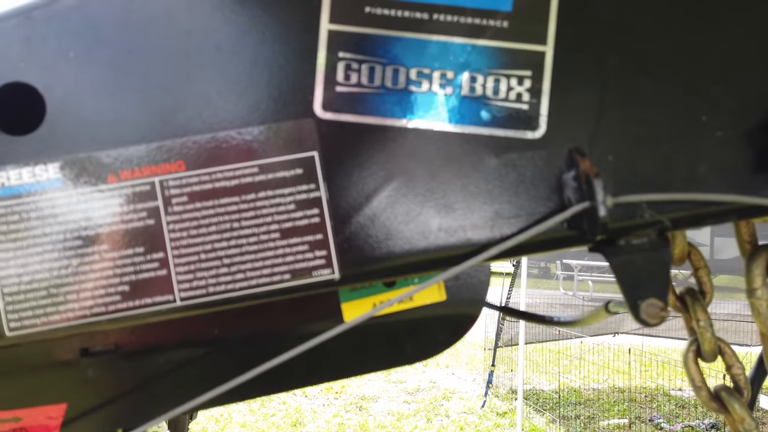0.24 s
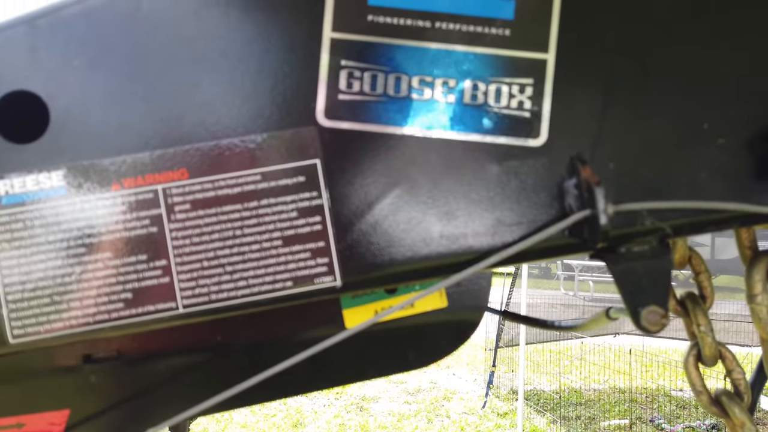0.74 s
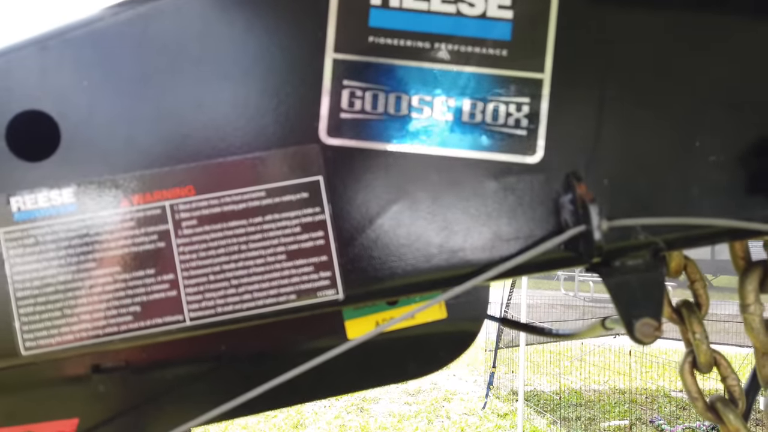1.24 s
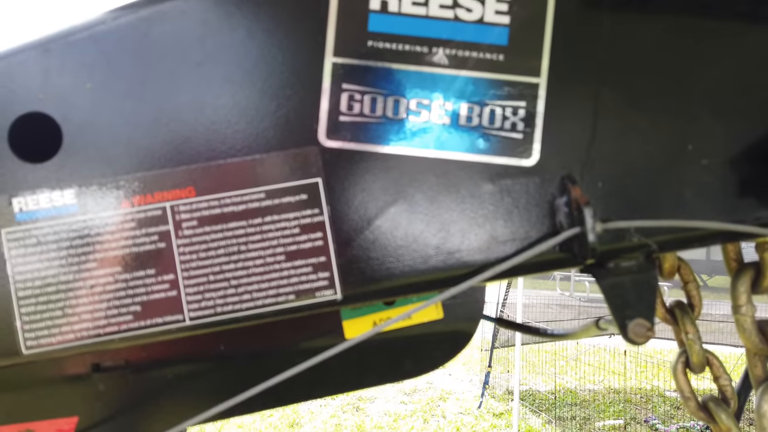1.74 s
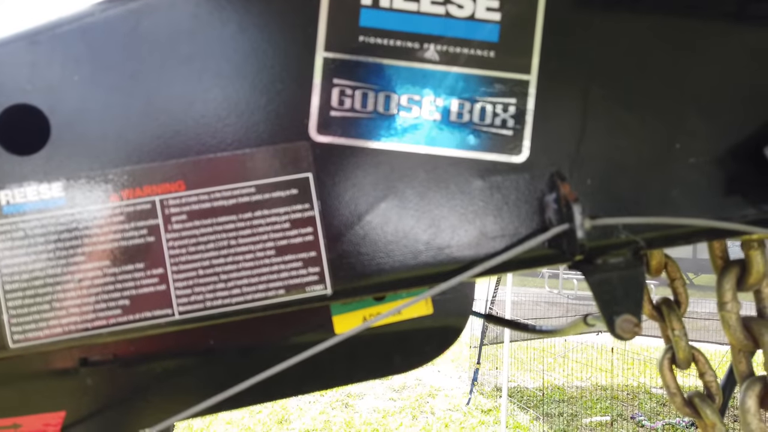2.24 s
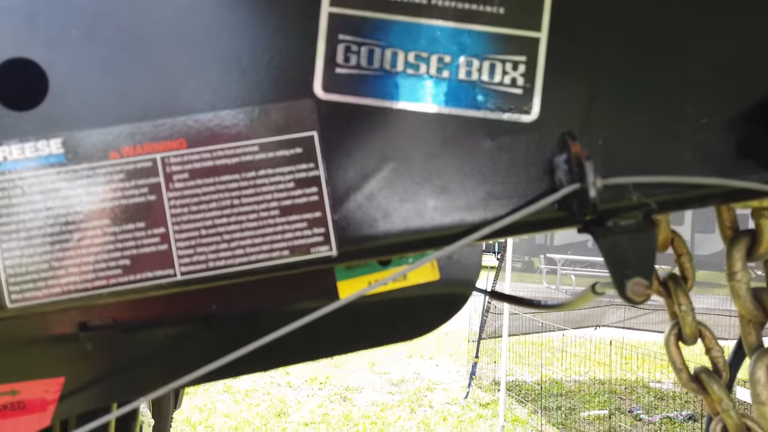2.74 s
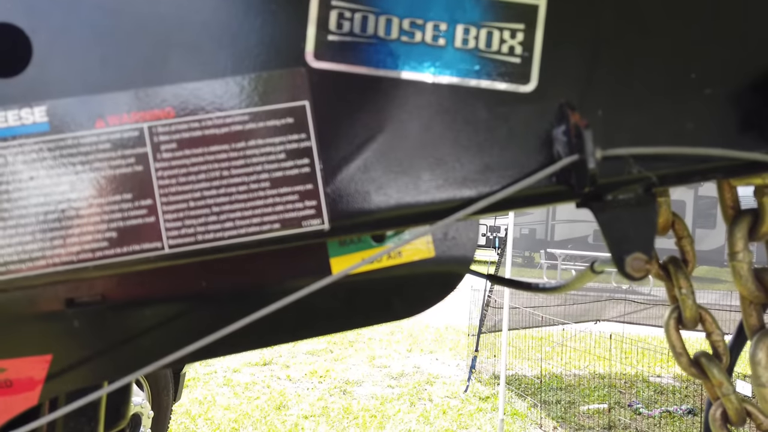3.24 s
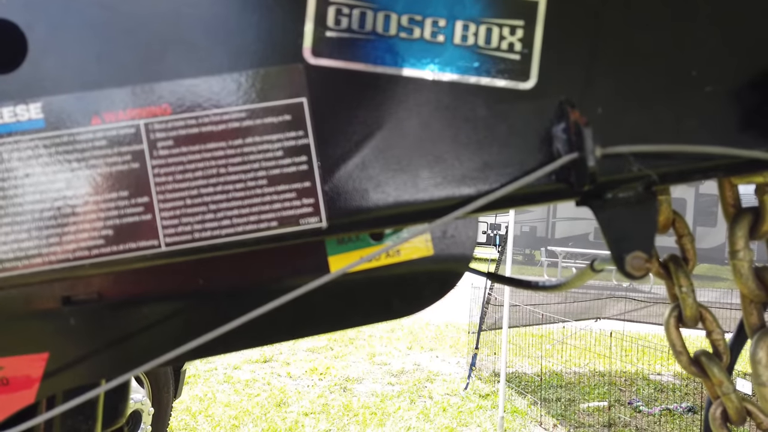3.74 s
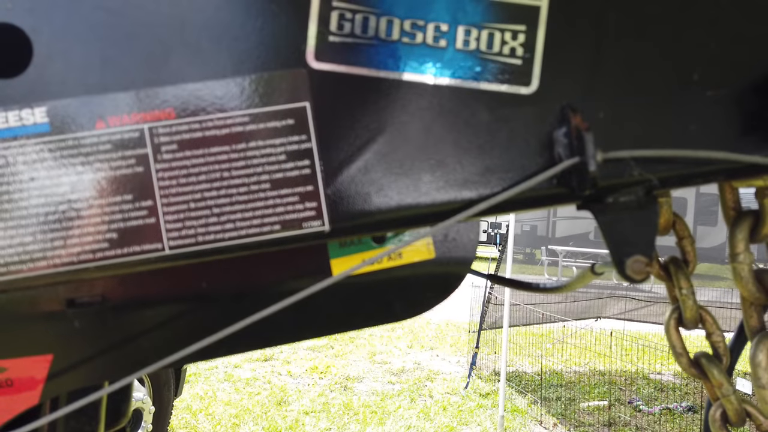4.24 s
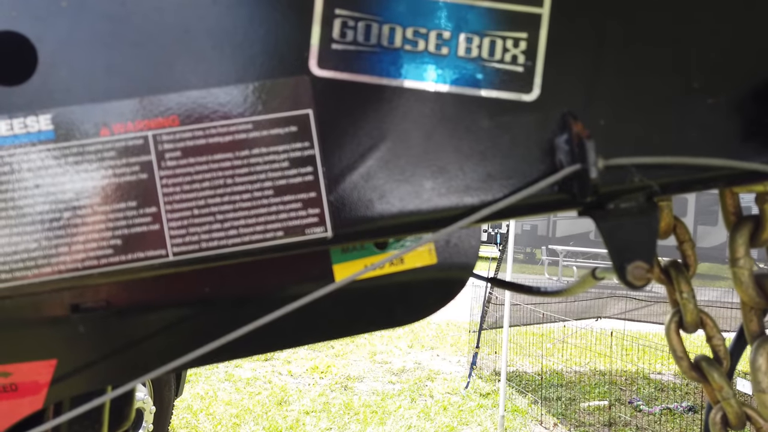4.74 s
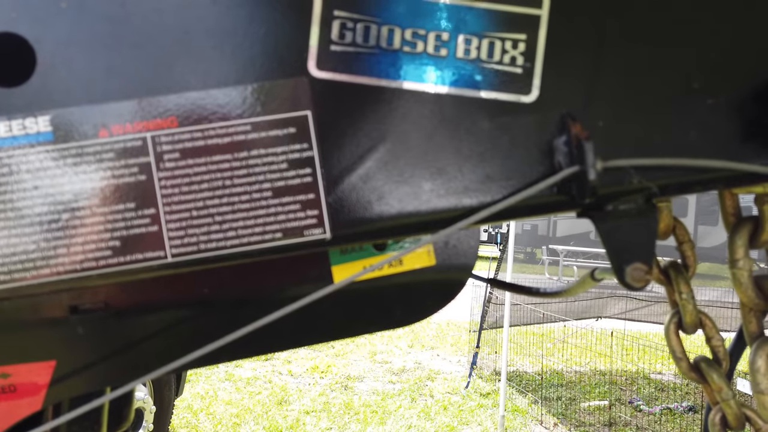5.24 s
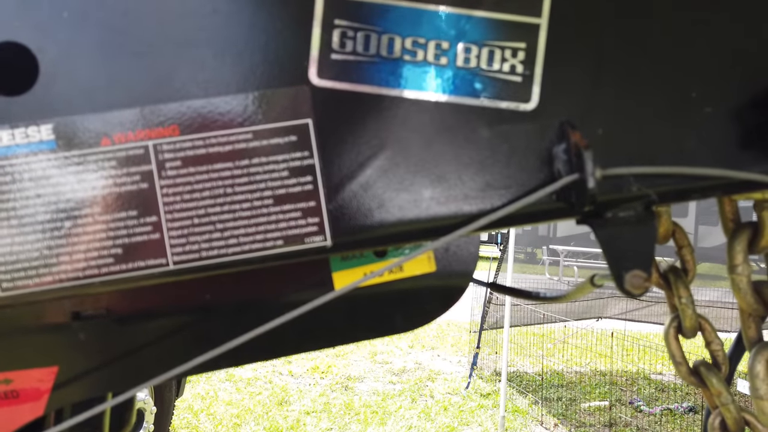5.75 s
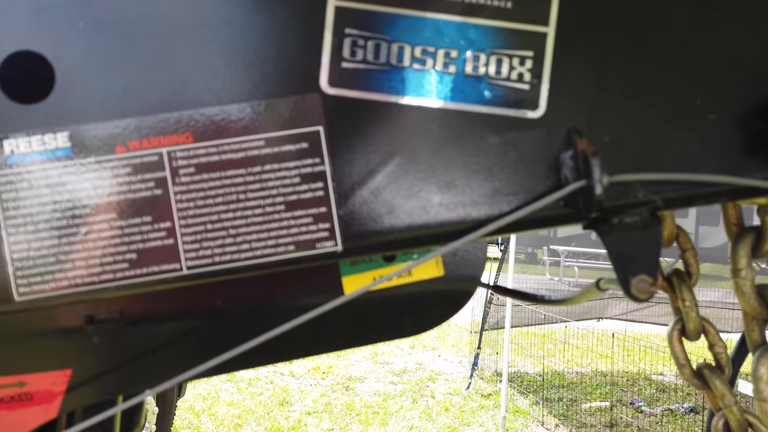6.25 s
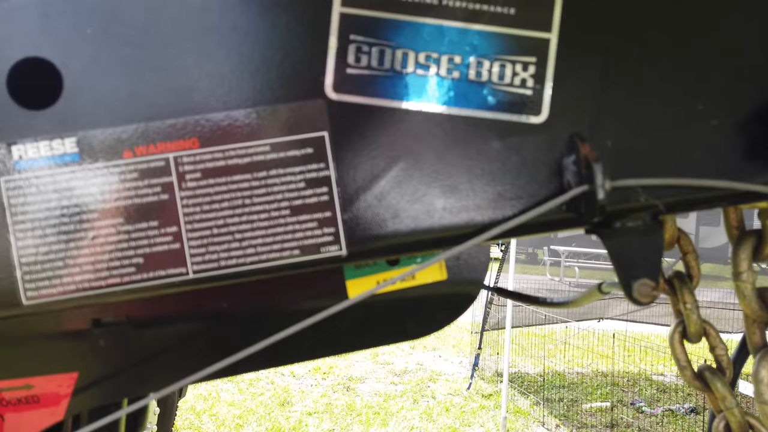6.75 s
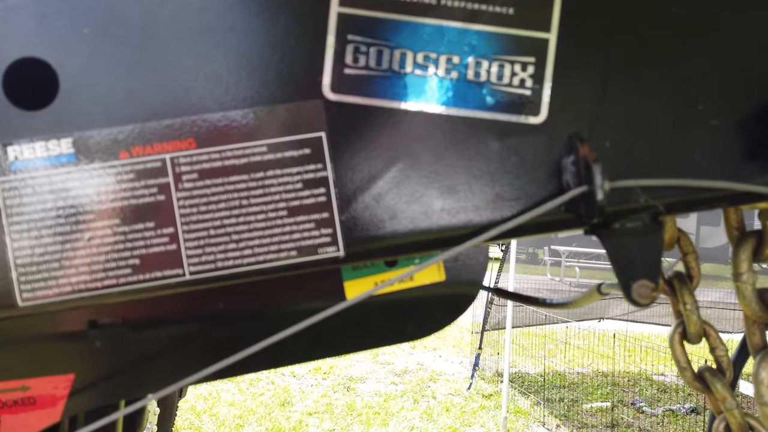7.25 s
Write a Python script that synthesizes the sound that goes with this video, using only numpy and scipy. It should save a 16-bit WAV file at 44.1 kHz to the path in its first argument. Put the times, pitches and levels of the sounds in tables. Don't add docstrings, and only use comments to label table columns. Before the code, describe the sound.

Close, continuous compressor buzz with a low tonal hum, airy rush and a thin whine that sinks, nearly vanishes, then returns weaker.

```python
import sys
import numpy as np
from scipy import signal
from scipy.fft import rfft, irfft, next_fast_len
from scipy.io import wavfile

SR = 44100
rng = np.random.default_rng(int(sys.argv[2]) if len(sys.argv) > 2 else 0)


def to_wav(sig):
    pcm = np.clip(np.atleast_2d(sig), -1, 1) * 32767
    pcm = np.round(pcm).astype(np.int16)
    wavfile.write(sys.argv[1], SR, pcm.T)


def magnitude_from_level(level_db):
    exponent = np.asarray(level_db, float) / 20
    return 10 ** exponent


N = 330734
SECONDS = np.arange(N) / SR
STEP = 4
BALLS_PER_TURN = 58 / 13
KNOCK_AT_S = 6.455
SHIFT_S = 6.25
# f/Hz, side re mid level/dB
SIDE_DB = [(60, -12), (110, -13), (200, -26), (380, -19), (700, -9), (1290, -9), (2380, -5), (4400, 4),
           (8120, 1), (15000, 0)]


def rms_one(x):
    return x / np.sqrt(np.mean(x ** 2) + 1e-20)


def at_hz(points, hz):
    points = np.array(points)
    return np.interp(np.log(hz), np.log(points[:, 0]), points[:, 1])


def ramp(start_s, end_s):
    return np.clip((SECONDS - start_s) / (end_s - start_s), 0, 1)


def blend(light, loaded, settled):
    return light + (loaded - light) * settled


def drift(rate_hz):
    r = np.exp(-80 * np.pi * rate_hz / SR)
    noise = rng.standard_normal(N // 40 + 2002)
    slow = signal.lfilter([1], [1, -2 * r, r * r], noise)[2000:]
    return np.interp(np.arange(N) / 40, np.arange(len(slow)), rms_one(slow))


def to_stereo(mid, side):
    return np.array([mid + side, mid - side])


def width_at(hz):
    return magnitude_from_level(at_hz(SIDE_DB, hz))


def gusts():
    rise_s, fall_s = 0.099, 0.085
    # t/s, peak level/dB
    puff_peaks = [(.08, -66), (1.52, -47), (2.05, -52), (2.46, -46), (3.2, -42), (3.87, -47), (4.25, -40),
                  (4.7, -47), (5.6, -56), (6.33, -39), (6.74, -37), (7.4, -54)]
    level = magnitude_from_level(-47 + 2.7 * drift(4.5))
    for at_s, peak_db in puff_peaks:
        away = np.where(SECONDS < at_s, (at_s - SECONDS) / rise_s, (SECONDS - at_s) / fall_s)
        level = level + magnitude_from_level(peak_db) * np.exp(-away ** 2)
    return level


def breeze():
    low = signal.butter(2, [18, 62], "band", fs=SR, output="sos")
    mid, side = signal.sosfilt(low, rng.standard_normal((2, N + SR)))[:, SR:]
    return gusts() * to_stereo(rms_one(mid), magnitude_from_level(-12) * rms_one(side))


def far_hum():
    # f/Hz, share of the swell, level/dB
    hum_lines = [(57.9, .95, -46.5), (120.2, 0.28, -44)]
    swell_db = 0
    for start_s, end_s, change_db in ((1.66, 3.7, 5.5), (5.2, 5.9, -17)):
        rise = ramp(start_s - .15, start_s + 0.27)
        fall = ramp(end_s - .15, end_s + 0.16)
        swell_db = swell_db + change_db * (rise - fall)
    hum = 0
    for hz, share, level_db in hum_lines:
        height = np.sqrt(2) * magnitude_from_level(level_db + swell_db * share + 1.25 * drift(3.2))
        hum = hum + height * np.sin(2 * np.pi * hz * SECONDS + 0.25 * drift(4.3))
    return hum


def air_noise(spectrum, low_hz, high_hz, patchy_db, pulse_db):
    size = next_fast_len(N)
    hz = np.maximum(np.arange(size // 2 + 1) * SR / size, 1)
    colour = magnitude_from_level(at_hz(spectrum, hz)) * np.sqrt(SR / 2)
    mid, side = rfft(rng.standard_normal((2, size))) * colour
    lagged = np.clip(.15 + .5 * (hz > 3900) - hz / 40000, 0, .7)
    side = (np.sqrt(lagged) * 1j * mid + np.sqrt(1 - lagged) * side) * width_at(hz)
    both = to_stereo(mid, side)
    edges = np.geomspace(low_hz, high_hz, int(3 * np.log2(high_hz / low_hz)) + 1)
    out = 0
    for low, high in zip(edges, edges[1:]):
        band = irfft(both * ((hz >= low) & (hz < high)), size)[:, :N]
        out = out + band * magnitude_from_level(patchy_db * drift(9.2) + pulse_db)
    return out


def ringing(hz, width_hz):
    r = np.exp(-np.pi * width_hz / SR)
    poles = [1, -2 * r * np.cos(2 * np.pi * hz / SR), r * r]
    once = signal.lfilter([1, 0, -1], poles, rng.standard_normal((2, N + SR)))
    mid, other = signal.lfilter([1, 0, -1], poles, once)[:, SR:]
    side = rms_one(np.gradient(mid)) + 0.98 * rms_one(other)
    return to_stereo(rms_one(mid), width_at(hz) * rms_one(side))


def valves(crank):
    # f/Hz, level/(dB per Hz)
    body_rush = [(90, -67), (300, -75.5), (500, -71), (660, -67), (800, -69), (950, -62.5), (1250, -66),
                 (1370, -61.5), (1700, -70), (1880, -61.5), (2240, -69.5), (2480, -71), (2950, -66.5),
                 (3900, -85.5)]
    # f/Hz, level/(dB per Hz)
    valve_hiss = [(3900, -93), (4300, -88.5), (4800, -99), (5150, -90.5), (5600, -88.5), (6200, -88),
                  (7400, -93), (8200, -87.5), (8800, -92), (9800, -94.5), (10700, -89), (12300, -99.5),
                  (13800, -92.5), (15500, -102)]
    # f/Hz, width/Hz, quiet level/dB, loud level/dB, loud from t/s, to t/s
    ring_table = [(5570, 80, -66, -63, 1.4, 3.0), (5835, 60, -65, -58, 2.5, 7.6),
                  (5920, 90, -66, -62, 2.5, 7.6), (6190, 35, -72, -66, .9, 2.6),
                  (6600, 60, -74, -66, -.1, 3.0), (8730, 50, -72, -68, 2.6, 7.6),
                  (8900, 70, -69, -61, -.1, 1.3), (10620, 45, -73, -63, 4.3, 6.3),
                  (7240, 80, -76, -72, 3, 7.6), (13500, 100, -76, -73, -.1, 3),
                  (2110, 60, -57, -54, -.1, 3), (2320, 60, -58, -53, -.1, 2.6),
                  (3680, 35, -68, -66, 3, 7.6)]
    puff_db = 1.4 * np.cos(crank) + 1.1 * np.cos(2 * crank + 1.5) + .8 * np.cos(3 * crank + 3.0)
    rush = air_noise(body_rush, 60, 3900, patchy_db=1.1, pulse_db=0.043 * puff_db)
    hiss = air_noise(valve_hiss, 3900, 21000, patchy_db=1.0, pulse_db=.9 * puff_db)
    rings = 0
    for hz, width_hz, quiet_db, loud_db, start_s, end_s in ring_table:
        knots_s = [start_s - .1, start_s + 0.32, end_s - .1, end_s + 0.055]
        level_db = np.interp(SECONDS, knots_s, [quiet_db, loud_db, loud_db, quiet_db])
        rings = rings + ringing(hz, width_hz) * magnitude_from_level(level_db + 1.8 * drift(1.0))
    return rush + hiss + rings * magnitude_from_level(0.5 * puff_db + 5.5)


def knocks(crank):
    # f/Hz, level/dB, t60/s
    knock_modes = [(1860, -22, .04), (1365, -32, .07), (1980, -30, .05)]
    turn = crank - crank[round(KNOCK_AT_S * SR)]
    passes = np.diff(np.floor(BALLS_PER_TURN * turn / (2 * np.pi)), prepend=0) == 1
    taps = passes * np.exp(70 * (np.cos(turn) - 1)) * magnitude_from_level(1.5 * rng.standard_normal(N))
    soft = signal.butter(3, [1100, 2500], "band", fs=SR, output="sos")
    taps = signal.sosfilt(soft, taps + 1e-18)
    out = 0
    for hz, level_db, t60_s in knock_modes:
        r, w = magnitude_from_level(-60 / (t60_s * SR)), 2 * np.pi * hz / SR
        ring = signal.lfilter([0, np.sin(w)], [1, -2 * r * np.cos(w), r * r], taps + 1e-18)
        ring = magnitude_from_level(level_db) * ring
        out = out + to_stereo(ring, width_at(hz) * np.gradient(ring) / w)
    return out


def tone(phase, level_db, wander_db, smear_rad, start_rad=None):
    hz = (phase[-1] - phase[0]) * SR / N / (2 * np.pi)
    chance_rad = rng.uniform(0, 2 * np.pi)
    phase = phase + (chance_rad if start_rad is None else start_rad) + smear_rad * drift(6.0)[::STEP]
    side = magnitude_from_level(at_hz(SIDE_DB, hz) + rng.normal(0, 1.0))
    height = np.sqrt(2) * magnitude_from_level(level_db + wander_db * drift(3.25)[::STEP])
    return height * to_stereo(np.sin(phase), side * np.cos(phase))


def throb(crank, depth_db, late):
    cycle = (crank - crank[round(KNOCK_AT_S * SR / STEP)]) / 13
    return depth_db * np.cos(cycle - 2 * np.pi * late)


def bearing(crank, turns_hz, settled):
    # ball-pass multiple, crank sideband, light load level/dB, settled level/dB
    ball_lines = [(1, 0, -32, -30), (1, 1, -53, -55), (1, 2, -56, -59), (1, 3, -57, -58), (1, 4, -46, -46),
                  (1, 6, -54, -55), (1, 7, -51, -51), (1, 12, -55, -54), (1, 15, -48, -50),
                  (1, 19, -48, -49), (3, -2, -52, -52), (3, -1, -41, -36), (3, 0, -42, -41),
                  (3, 1, -51, -53), (3, 2, -60, -65), (3, 4, -57, -60), (3, 5, -47, -49), (6, -1, -55, -49),
                  (6, 0, -46, -47), (8, 0, -50, -51), (8, 1, -48, -47), (9, 0, -49, -46), (9, 1, -44, -45),
                  (12, -1, -54, -57), (12, 0, -47, -53), (12, 1, -54, -60)]
    panel_hz, panel_half_width_hz = 228.9, 1.42
    detune = (BALLS_PER_TURN * turns_hz - panel_hz) / panel_half_width_hz
    drone_db = -29 - 10 * np.log10(1 + detune ** 2) + throb(crank, 0.6, 0.36)
    third_db = blend(-47, -37.5, settled) + throb(crank, 1.7, 0.51)
    triple_db = blend(-40.5, -42.5, settled) + throb(crank, 5, 0.19)
    balls = BALLS_PER_TURN * crank + 0.14 * drift(1.92)[::STEP]
    out = tone(balls, drone_db - .2, wander_db=0.42, smear_rad=0.13)
    out += tone(3 * balls - crank, third_db + 1.5, wander_db=.3, smear_rad=.05)
    out += tone(3 * balls, triple_db, wander_db=1.0, smear_rad=.12)
    for m, k, light_db, loaded_db in ball_lines:
        m, k = round(m), round(k)
        if (m, k) not in [(1, 0), (3, -1), (3, 0)]:
            level_db = blend(light_db, loaded_db, settled)
            out += tone(m * balls + k * crank, level_db, wander_db=1.0, smear_rad=0.037 * (m + abs(k)))
    return out


def whine(crank, settled):
    # crank order, light load level/dB, settled level/dB
    whine_orders = [(35, -49, -50), (37, -51, -49), (40, -48, -47), (41, -43, -47), (49, -55, -63),
                    (50, -51, -46), (51, -53, -48), (52, -63, -60), (54, -53, -57), (55, -51, -52),
                    (56, -34, -46), (57, -35, -50), (58, -54, -49), (59, -41, -46), (60, -58, -56),
                    (61, -53, -53), (62, -56, -61), (67, -60, -58)]
    shift_db = {57: 5, 59: -8}
    shifted = ramp(SHIFT_S - .04, SHIFT_S + .04)[::STEP]
    sagged_db = -30.5 - 1.7 * 2.66
    main_db = np.interp(SECONDS, [0, 2.66, 3.5, 3.9, 4.2], [-30.5, sagged_db, -64, -64, -43.5])
    main_db = (main_db + 1.4 * drift(2.5))[::STEP] - 3.5 * shifted
    crank = crank + .014 * drift(6)[::STEP]
    out = tone(56 * crank, main_db - .8, wander_db=.6, smear_rad=.2, start_rad=0)
    for k, light_db, loaded_db in whine_orders:
        if round(k) != 56:
            level_db = blend(light_db, loaded_db, settled) + shift_db.get(k, 0) * shifted
            start_rad = .05 * (k - 56) ** 2
            out += tone(round(k) * crank, level_db, wander_db=2.0, smear_rad=.25, start_rad=start_rad)
    return out


def pump(crank, settled):
    # crank order (rounded in use), light load level/dB, settled level/dB
    stroke_orders = [(0.973, -54, -51), (1.972, -58, -50), (3.012, -42.5, -43), (4.082, -40.5, -38),
                     (5.04, -46, -47.5), (6.02, -43.5, -45.5), (6.94, -54, -44.5), (7.787, -45, -45.5),
                     (8.896, -39, -42), (10.95, -57, -54), (12.27, -49, -43.5), (13.07, -37.5, -44),
                     (13.98, -50.5, -43.5), (14.97, -50, -52.5), (16.1, -38, -48), (17.02, -45, -44.5),
                     (17.93, -31, -33), (19.18, -94, -59.5), (19.84, -40, -44.5), (21.65, -39, -64),
                     (21.93, -58, -49.5), (23.54, -48, -77), (25.14, -55.5, -85), (26.5, -47, -44.5),
                     (27.04, -54, -55.5), (27.97, -44, -48), (30.02, -45.5, -50.5), (32, -56, -52),
                     (30.82, -48, -55)]
    shifted = ramp(SHIFT_S - .04, SHIFT_S + .04)[::STEP]
    slot_db = -33 - 0.51 * SECONDS[::STEP] - 5 * shifted
    slot_db = slot_db + throb(crank, 1.1, 0.72) * (1 + 1.5 * shifted)
    out = tone(18 * crank, slot_db - .6, wander_db=.3, smear_rad=.3)
    for k, light_db, loaded_db in stroke_orders:
        if round(k) != 18:
            level_db = blend(light_db, loaded_db, settled)
            out += tone(round(k) * crank, level_db, wander_db=2.0, smear_rad=0.013 * k)
    return out


def scene():
    # t/s, share 0-1
    load_curve = [
        (0, 0.7),
        (2.45, 0.4),
        (2.8, 0.96),
        (7.5, 1.0),
    ]
    turns_hz = 51.635 - .0845 * SECONDS
    hunting_hz = .025 * drift(1.2)
    crank = np.cumsum(2 * np.pi * (turns_hz + hunting_hz) / SR) + 0.0069 * drift(8.4)
    settled = np.interp(SECONDS, *np.transpose(load_curve))[::STEP]
    turn = crank[::STEP]
    lines = bearing(turn, turns_hz[::STEP], settled) + whine(turn, settled) + pump(turn, settled)
    lines = signal.resample_poly(lines, STEP, 1, axis=1)[:, :N]
    return breeze() + far_hum() + valves(crank) + knocks(crank) + lines


def roll_off(x):
    return signal.sosfilt(signal.butter(12, 15740, fs=SR, output="sos"), x)


def record(dry):
    return roll_off(dry)


dry = scene()
out = record(dry)
to_wav(out)
```